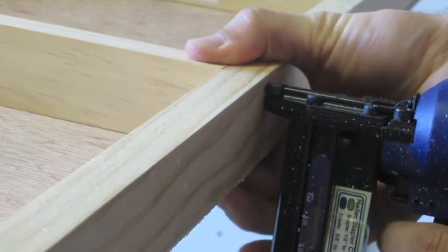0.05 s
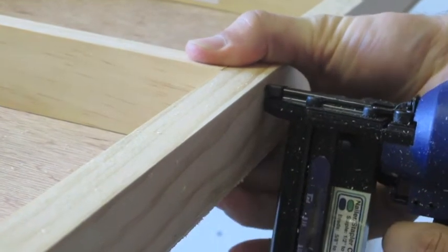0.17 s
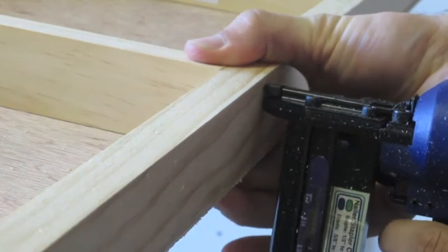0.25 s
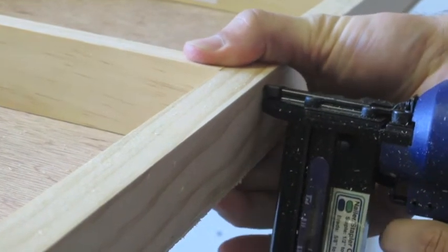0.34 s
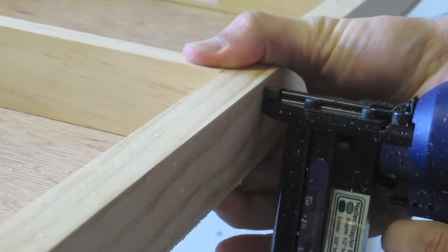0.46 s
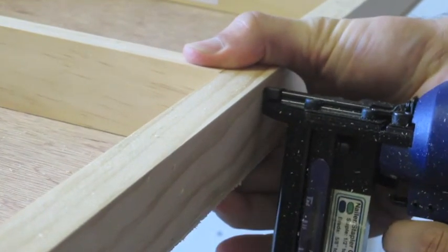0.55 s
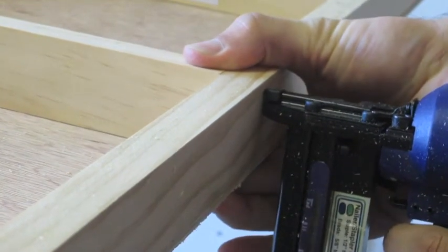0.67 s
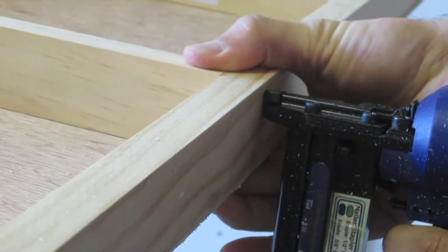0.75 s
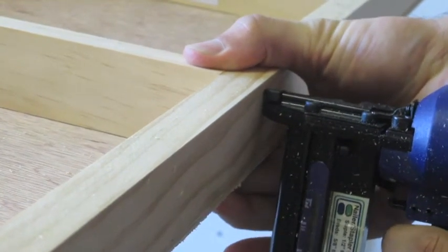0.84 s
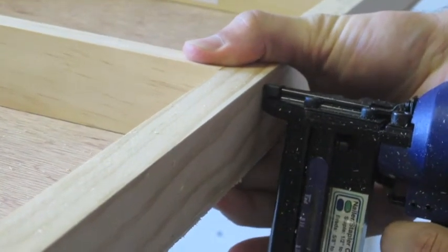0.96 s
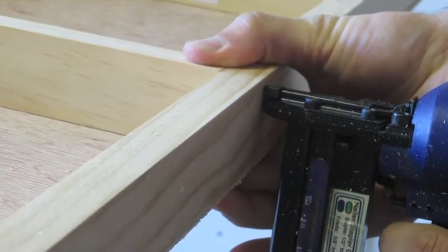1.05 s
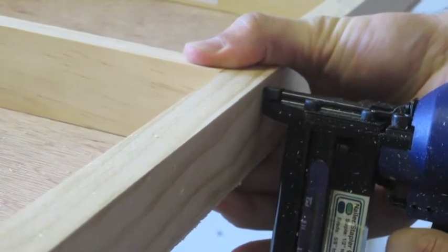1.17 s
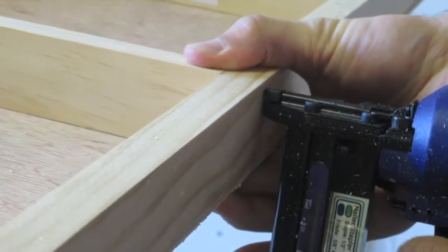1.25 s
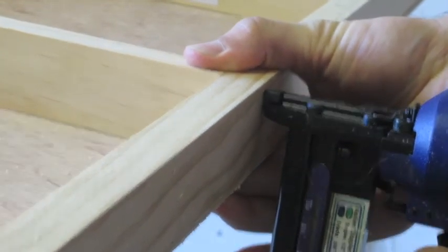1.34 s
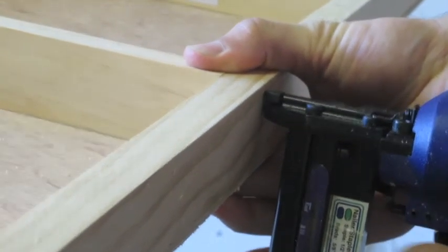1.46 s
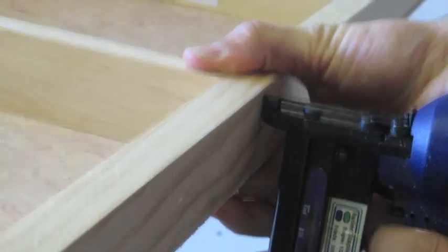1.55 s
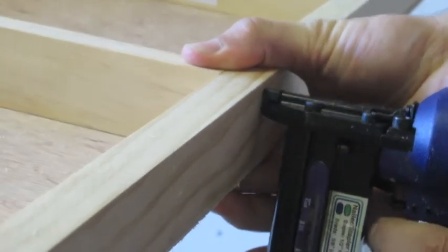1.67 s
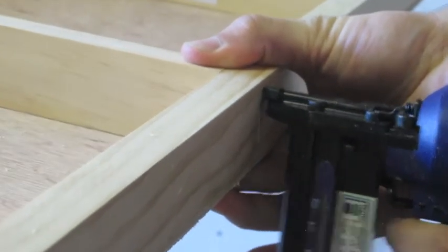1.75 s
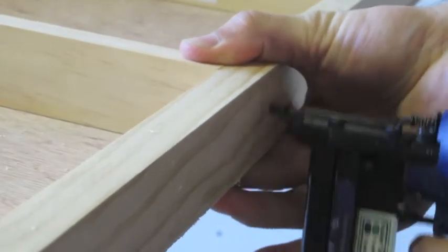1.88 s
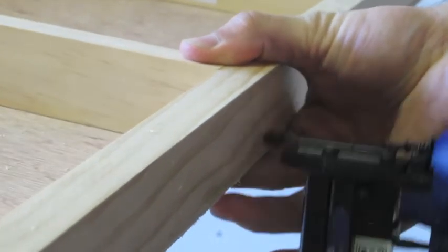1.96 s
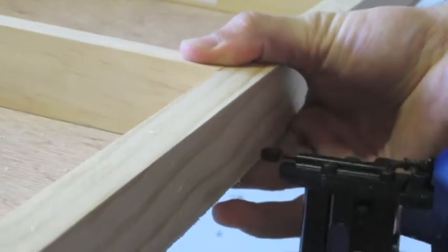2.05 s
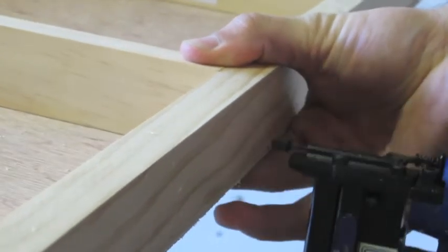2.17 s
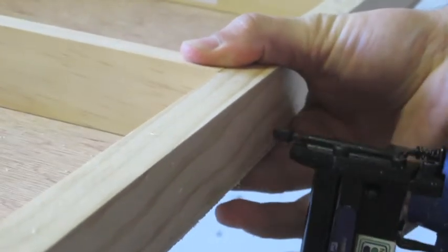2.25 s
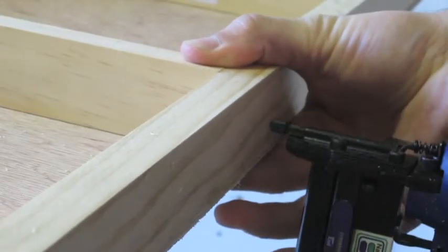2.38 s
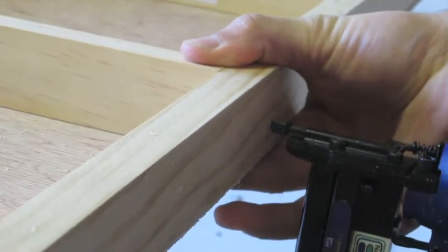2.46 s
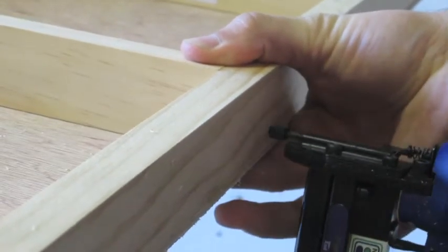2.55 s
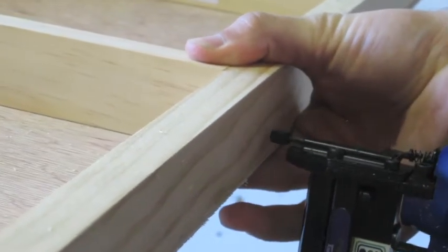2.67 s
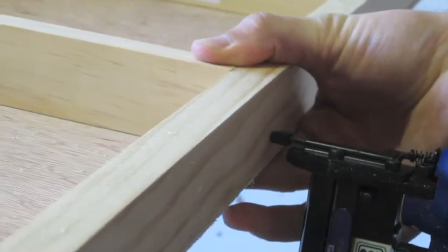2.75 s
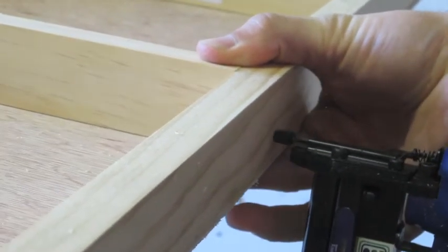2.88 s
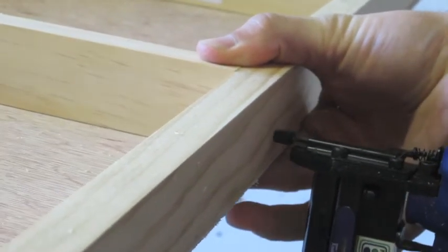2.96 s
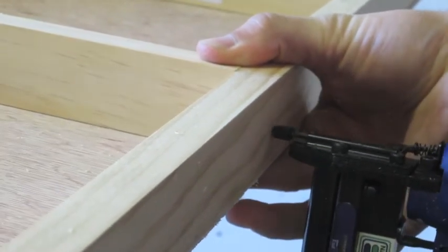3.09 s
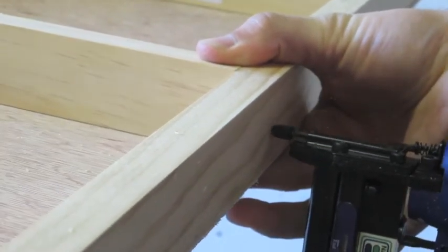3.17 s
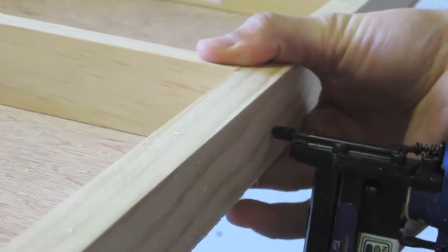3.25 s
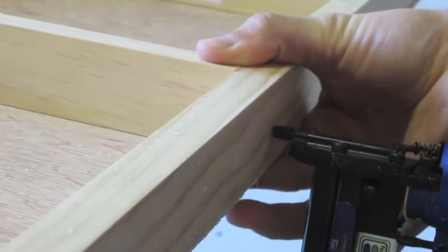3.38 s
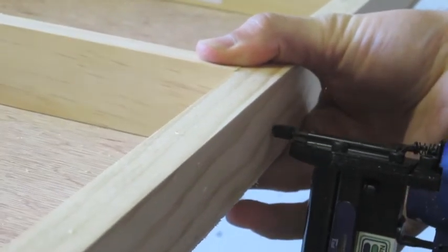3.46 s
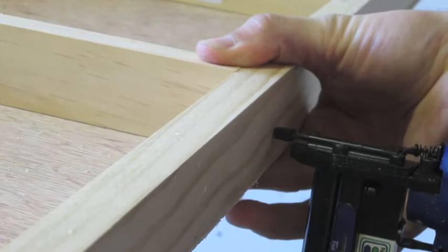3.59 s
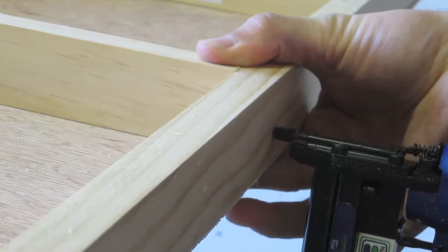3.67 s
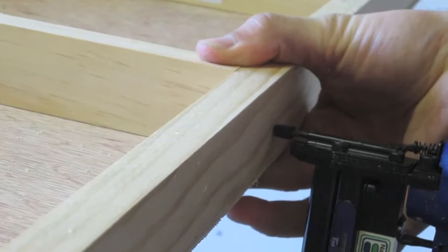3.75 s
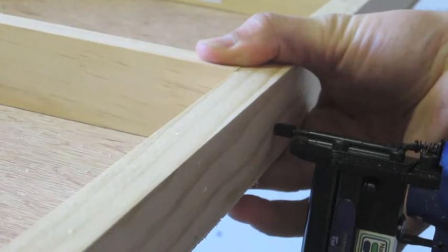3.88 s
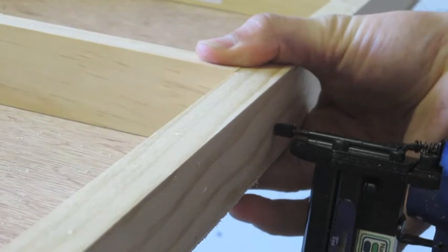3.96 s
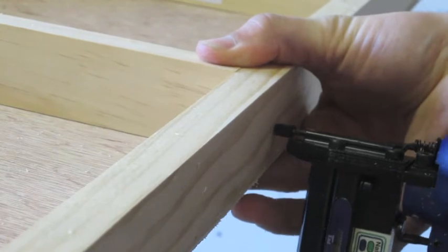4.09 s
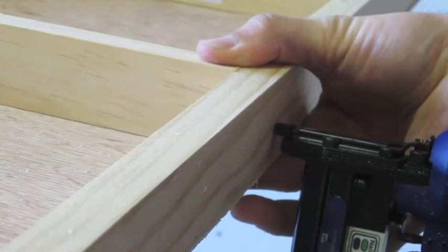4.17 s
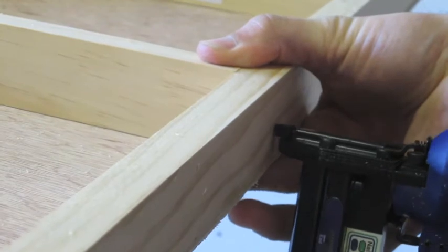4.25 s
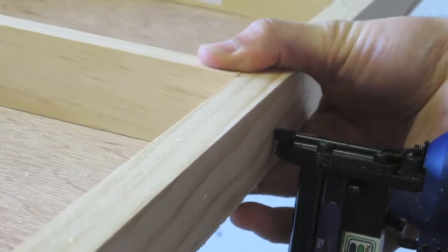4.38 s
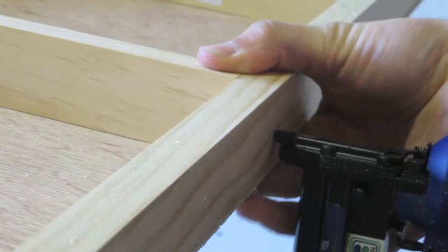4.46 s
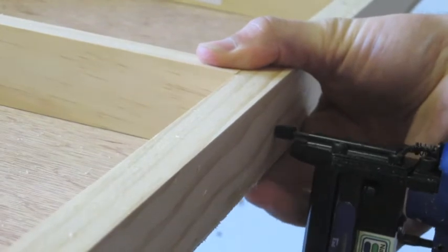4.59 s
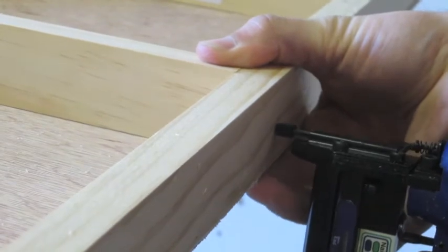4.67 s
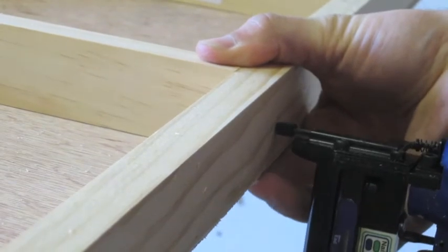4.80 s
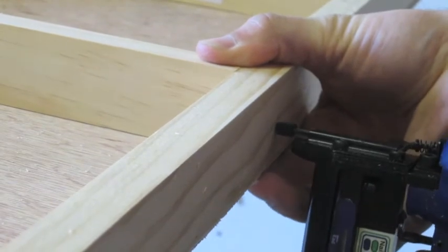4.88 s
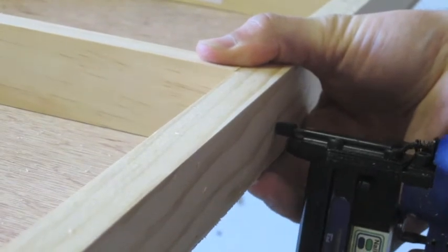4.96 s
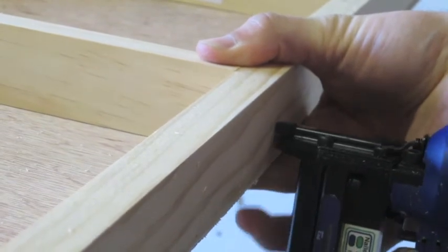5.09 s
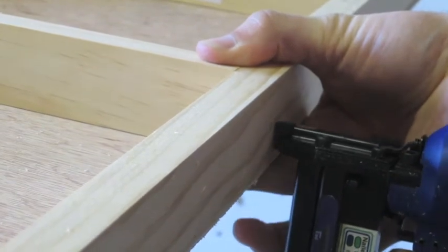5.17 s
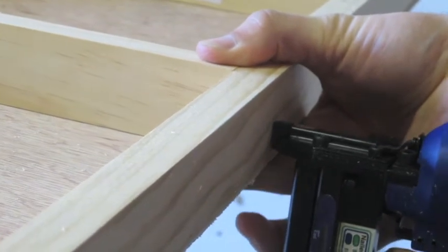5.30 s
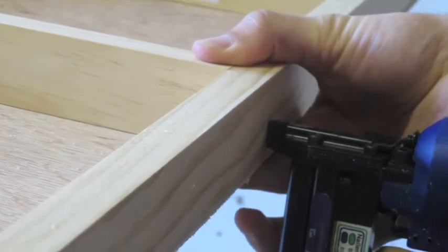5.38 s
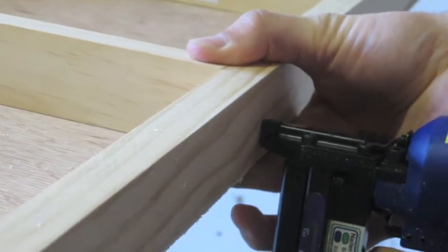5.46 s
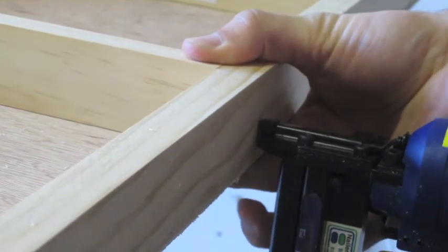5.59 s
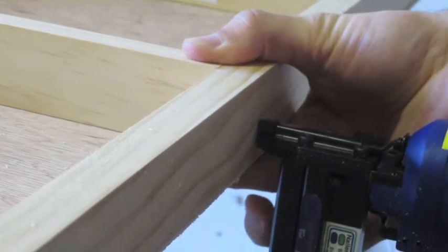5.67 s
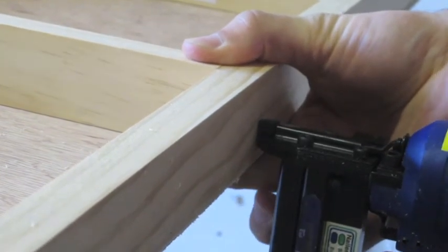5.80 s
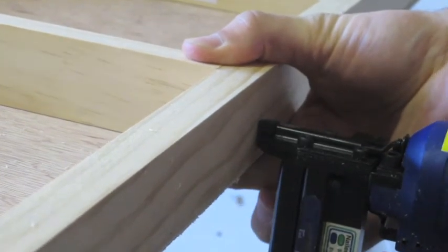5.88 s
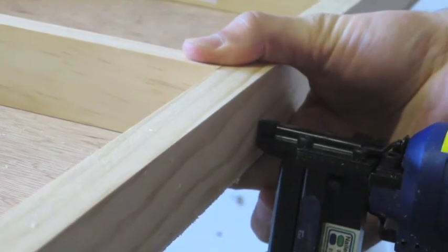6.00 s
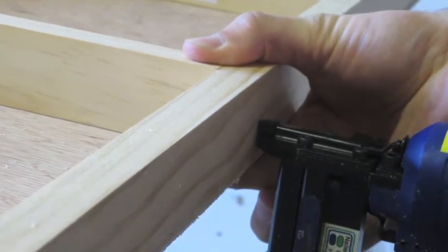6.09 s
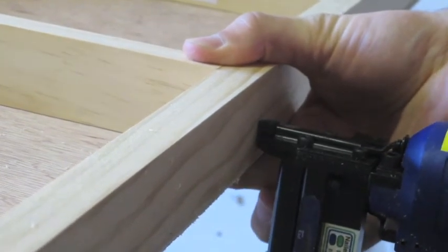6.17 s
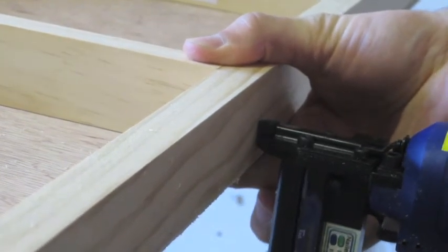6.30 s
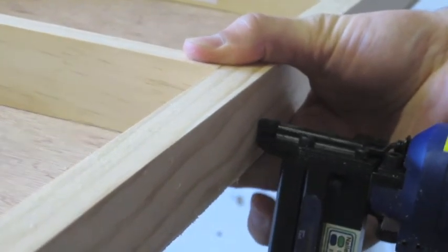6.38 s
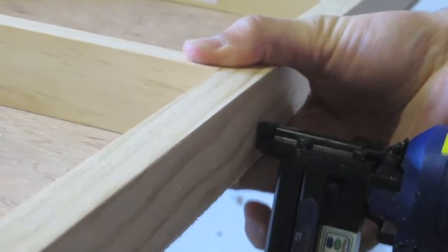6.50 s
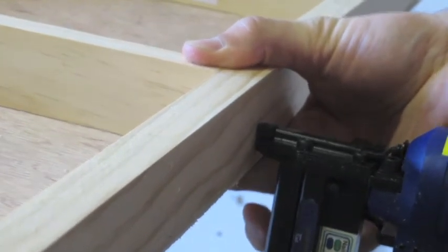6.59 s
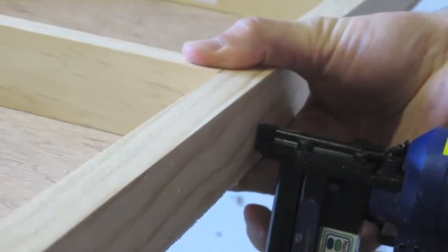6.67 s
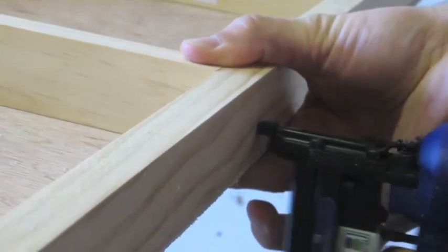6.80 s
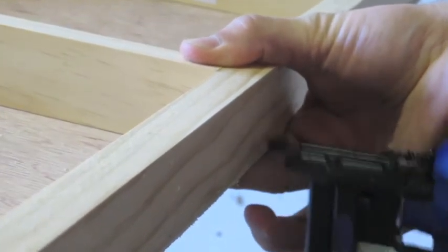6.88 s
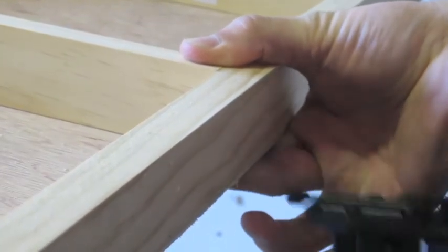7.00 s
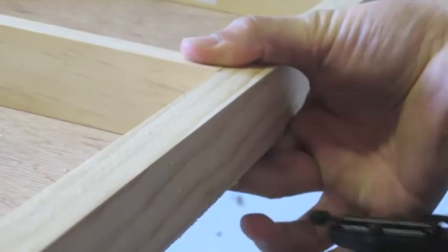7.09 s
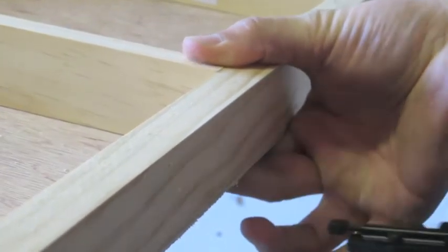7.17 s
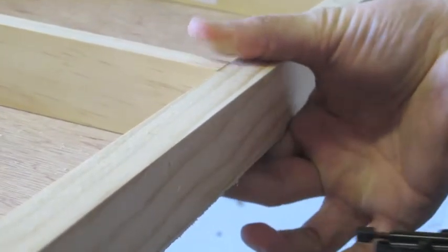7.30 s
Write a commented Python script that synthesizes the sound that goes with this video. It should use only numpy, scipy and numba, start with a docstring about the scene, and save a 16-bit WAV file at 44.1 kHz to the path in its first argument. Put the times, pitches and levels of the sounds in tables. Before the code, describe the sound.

A quiet, low workshop rush runs throughout, with faint distant chirps near 0.2, 0.8, 2.5, 3.5, 4.0 and 6.1 s. A small tap and soft bump come at 0.15 s; a thin, very high wavering air whistle plays from 0.2 to 0.9 s, with tiny bright catches up to 1.1 s. At 1.3 s a trigger tick leads into a hard valve crack and driver slam into wood, with room tail. At 1.5 s a click and sharp exhaust blast with a piston knock; at 1.84 s a steel snap. A slide leads to a double tap at 2.8 s, then scattered clicks, light rattles, rubs and dull thuds until 5.8 s, fullest around 4.5-5.2 s. The second shot bangs at 6.3 s, exhaust bursts at 6.5 s, tip snaps at 6.86 s, then the tail fades. Background dips after blasts and slowly recovers.

```python
"""Air brad nailer in a live workshop

An air nailer fires two brads into a wooden frame: trigger tick, valve crack and driver blow in shaped noise
and struck modes, then the exhaust's hiss, the piston's knock and the safety tip's snap.
Around the shots the nose taps, catches and slides on the wood; a hose coupling whistles on two gliding
harmonics, faint chirps call from afar, and a steady rush of noise lies beneath. A room tail answers the gun,
its contacts and the chirps; a gain control ducks on loud peaks and slowly recovers."""
import sys
import numpy as np
from scipy import signal
from scipy.fft import rfft, irfft
from scipy.io import wavfile
from scipy.ndimage import uniform_filter1d, map_coordinates
from numba import njit

SR = 44100
rng = np.random.default_rng(int(sys.argv[2]) if len(sys.argv) > 2 else 0)


def store_pcm(level_fs):
    """Save levels as 16-bit WAV."""
    pcm = np.round(np.clip(level_fs, -1, 1) * 32767).astype(np.int16)
    wavfile.write(sys.argv[1], SR, np.atleast_2d(pcm).T)


N = 323780
T = np.arange(SR // 2) / SR  # time within one event [s]

# firing strokes: (trigger pulled [s], valve opens [s], driver lands [s], ring level before a common boost [dB])
SHOTS = [(1.2898, 1.315, 1.3388, 8), (6.3082, 6.3219, 6.3407, 10.5)]
# return strokes: (exhaust opens [s], exhaust level [dB], safety tip snaps back [s])
RETURNS = [(1.52, 7.2, 1.8378), (6.5093, 8.3, 6.8583)]
# modes of the gun's metal housing: (frequency [Hz], relative level [dB], t60 [s])
HOUSING = [(1184, 0, .7), (1575, -6.5, .7), (4600, -7, .55), (4810, -7, .5), (5265, -6, .6),
           (8604, -5, .45), (9960, -6, .45), (12322, -7, .4)]
# modes of the frame on the bench: (frequency [Hz], relative level [dB], t60 [s])
FRAME = [(130.8, -0.5, .6), (212, -3.5, .25), (228, -6, 0.7), (270, -11, 0.27)]


def amp(db):
    """Decibels to gain."""
    return 10 ** (np.asarray(db) / 20)


def unit(x):
    """Scaled to rms 1."""
    return x / np.sqrt(np.mean(x ** 2) + 1e-20)


def along(points, hz):
    """Interpolate (Hz, value) points on a log frequency axis."""
    f, v = np.transpose(points)
    return np.interp(np.log(hz + 1), np.log(f + 1), v)


def add(track, s, sound):
    """Mix a sound into the track at time s."""
    start = max(round(s * SR), 0)
    track[start:start + len(sound)] += sound[:max(N - start, 0)]


def noise(spectrum, size=len(T)):
    """Noise of rms 1 with a given colour."""
    white = rfft(rng.standard_normal(size))
    colour = amp(along(spectrum, np.fft.rfftfreq(size, 1 / SR)))
    return unit(irfft(white * colour, size))


def resonant(peaks, size=len(T)):
    """A body shaken at random: noise of rms 1 in its resonances."""
    f = np.fft.rfftfreq(size, 1 / SR)
    body = 0
    for k, (hz, width, db) in enumerate(peaks):
        resonance = 1j * f * width / (hz * hz - f * f + 1j * f * width)
        body = body + (-1) ** k * amp(db) * resonance  # neighbours in opposite phase
    return unit(irfft(rfft(rng.standard_normal(size)) * body, size))


def ring(modes):
    """Struck modes that die away, each at a slightly new strength."""
    out = np.zeros(len(T))
    for hz, db, t60 in modes:
        decay = amp(db + rng.normal(0, 1) - 60 * T / t60)
        out += decay * np.sin(2 * np.pi * hz * T)
    return out


def burst(rise, hold, t60):
    """An envelope that rises, holds and dies away."""
    return (1 - np.exp(-T / rise)) * amp(-60 * np.maximum(T - hold, 0) / t60)


def background():
    """The steady rush of the workshop: coloured noise drifting slightly in level."""
    # rush of the workshop: (frequency [Hz], relative density [dB])
    air_colour = [(12, -36), (20, -3.5), (98, -0.5), (222, -8.5), (310, -12), (607, -12), (802, -9.5),
                  (1060, -12.5), (1570, -17), (2750, -26), (5080, -30), (6720, -31.5), (7310, -31.5),
                  (13200, -39.5), (16000, -49.5)]
    drift = map_coordinates(rng.standard_normal(64), [np.arange(N) / SR * 4])  # 4 random points a second
    return amp(-49.5 + .4 * drift) * noise(air_colour, size=N)


def chirps():
    """Short calls whose falling pitch wavers at random under a half-sine swell."""
    # faint high chirps: (time [s], middle pitch [Hz], level before distance and room [dB])
    calls = [(.191, 3900, -57), (.785, 4850, -56.5), (2.45, 3900, -61), (3.5, 5600, -65), (4.03, 4750, -57),
             (6.1, 4300, -66.5)]
    length_s, fall = .12, .13  # fall: share of the middle pitch
    out = np.zeros(N)
    for s, middle_hz, db in calls:
        u = np.minimum(T / length_s, 1)
        waver = unit(uniform_filter1d(rng.standard_normal(len(T)), size=60))
        hz = middle_hz * (1 - fall * (u - .5)) * (1 + .07 * waver)
        add(out, s, amp(db) * np.sin(np.pi * u) * np.sin(2 * np.pi * np.cumsum(hz) / SR))
    return out


def leak():
    """Air whistles at the hose coupling on its second and third harmonics, over a narrow hiss; less flow is lower and softer."""
    # whistle's path: (time [s], fundamental [Hz])
    pitch_path = [(.2, 4170), (.33, 4430), (.441, 4880), (.51, 4780), (.581, 5000), (.63, 4820),
                  (.72, 5030), (.79, 4650), (.92, 3800)]
    # narrow hiss: (frequency [Hz], width [Hz], relative level [dB])
    hiss_peak = [(2606, 170, 0)]
    s, hz = np.transpose(pitch_path)
    db = -64 + .006 * (hz - hz.max())  # softer by .006 dB per Hz below the highest pitch
    t = np.arange(N) / SR
    flutter = unit(uniform_filter1d(rng.standard_normal(N), size=30))
    flicker = unit(uniform_filter1d(rng.standard_normal(N), size=900))
    phase = 2 * np.pi * np.cumsum(np.interp(t, s, hz) * (1 + .012 * flutter)) / SR
    second, third = np.sin(2 * phase), np.sin(3 * phase)
    whistle = amp(-4 + 3 * flicker) * (second + amp(-6) * third)
    hiss = amp(6.5) * resonant(hiss_peak, size=N)
    level = amp(np.interp(t, s, db, left=-150, right=-150))  # inaudible outside the path
    return level * (whistle + hiss)


def clicks(rows, steel_t60):
    """Loose steel parts rattle briefly at each contact, with a bright tick and a knock in the wood."""
    # resonances of the gun's nose: (frequency [Hz], width [Hz], relative level [dB])
    steel = [(1300, 250, -3.5), (2150, 260, 0), (2550, 400, 0.5), (3640, 450, 1), (4700, 600, -5),
             (6300, 1200, -10.5)]
    # knock in the wood: (frequency [Hz], relative density [dB])
    wood_colour = [(60, -13.5), (200, -8), (450, -4), (750, 1), (1150, -2.5), (2500, -20), (8000, -57)]
    out = np.zeros(N)
    for s, steel_db, wood_db, tick_db, tick_hz, length in rows:
        # each contact falls on another spot and weights the resonances anew
        spot = [(hz * np.exp(rng.normal(0, 0.031)), width, db + rng.normal(0, 1)) for hz, width, db in steel]
        tick = noise([(tick_hz / 4, -30), (tick_hz * .8, -8), (tick_hz, 0),
                      (tick_hz * 1.2, -7), (tick_hz * 1.5, -18), (tick_hz * 2, -25)])
        add(out, s, amp(steel_db) * resonant(spot) * burst(rise=0.00015, hold=length, t60=steel_t60))
        add(out, s, amp(tick_db) * tick * burst(rise=.0002, hold=length, t60=0.011))
        add(out, s, amp(wood_db) * noise(wood_colour) * burst(rise=0.00028, hold=length, t60=0.067))
    return out


def taps():
    """The harder the nose taps, the brighter it cracks; a light catch of the tip is almost all tick."""
    # nose on wood: (time [s], steel level [dB], knock level [dB], rattle hold [s])
    nose_taps = [(.1472, -43, -43.5, .0046), (1.096, -47.5, -70, .001), (2.8095, -44, -34, .0025),
                 (2.8248, -33, -35.5, .0074), (3.162, -46, -62, .0035), (3.43, -55, -40, .0015),
                 (3.4515, -41.5, -40, .0029), (3.6594, -47.5, -49, .004), (3.8061, -39.5, -53, .002),
                 (3.9293, -52, -62, .002), (4.521, -33, -40.5, .0025), (4.61, -55, -44, .005),
                 (4.7365, -41, -52, .003), (4.749, -38.5, -44, .0027), (4.7675, -47, -54, .002),
                 (5.1156, -37, -45, .0018), (5.2069, -46.5, -37.5, .003), (5.3975, -39, -40, .0029),
                 (5.8265, -36.5, -39.5, .0042)]
    # light catches of the tip: (time [s], tick level [dB], tick pitch [Hz])
    tip_catches = [(.7678, -49.5, 10000), (.9404, -41.5, 8500), (.9708, -43, 9500), (3.4364, -39.5, 10200),
                   (4.1079, -46, 9450), (4.6541, -49, 8000), (4.953, -48.5, 9400)]
    # crack of a tap: (frequency [Hz], relative density [dB])
    crack_colour = [(1000, -37), (4000, -4.5), (7000, -0.5), (9000, 0), (12000, -5), (15500, -13.5)]
    tap_hz, catch_s = 6800, .0013  # a tap's tick pitch [Hz]; a catch's hold [s]
    out, rows = np.zeros(N), []
    for s, db, wood_db, length in nose_taps:
        bright_db = db + .35 * (db + 20)  # tick and crack would equal the steel at -20 dB
        rows.append((s, db, wood_db, bright_db, tap_hz, length))
        add(out, s, amp(bright_db) * noise(crack_colour) * burst(rise=.0001, hold=length / 2, t60=.008))
    for s, db, hz in tip_catches:
        rows.append((s, db - 15, db - 21, db, hz, catch_s))
    return out + clicks(rows, steel_t60=.031)


def handling():
    """The nose taps and rubs along the frame, which thuds on the bench as a decaying tone and low noise."""
    # soft bumps: (time [s], tone level [dB], shudder level [dB], resonance [Hz], hold [s])
    bumps = [(.149, -51.5, -52.5, 199.4, .047), (3.432, -58, -48, 200, .02), (4.531, -54, -50.5, 132, .11),
             (5.101, -38.5, -50.5, 128, .035), (5.207, -39, -39, 128.5, .034),
             (5.216, -34, -46, 212.4, .037), (5.828, -48, -45.5, 206.5, .052)]
    # slides over the wood: (middle [s], level [dB])
    slides = [(2.759, -48.5), (4.578, -55.5), (5.47, -48.5)]
    # rub on wood: (frequency [Hz], relative density [dB])
    rub_colour = [(100, 5), (900, 6), (2500, -2), (6000, -7.5), (11000, -13.5), (15500, -24)]
    slide_half_s = .088  # a slide swells and fades over this time
    out = taps()
    for s, tone_db, shudder_db, hz, length in bumps:
        shudder = noise([(hz / 3, -10), (hz, 0), (hz * 2, -3), (hz * 5, -24), (hz * 20, -70)])
        thud = amp(tone_db) * np.sin(2 * np.pi * hz * T) + amp(shudder_db) * shudder
        # the hand cushions the bump: a slow rise
        add(out, s, thud * burst(rise=.004, hold=length, t60=.18))
    for middle, db in slides:
        swell = np.exp(-(T / slide_half_s - 2) ** 2)
        add(out, middle - 2 * slide_half_s, amp(db) * noise(rub_colour) * swell)
    return out


def latches():
    """The trigger clicks before each shot and just before the exhaust; the safety tip snaps back and rings the housing."""
    # one latch each: (steel level [dB], knock level [dB], tick level [dB], tick pitch [Hz], rattle hold [s])
    trigger_pull = (-42.5, -54, -28.5, 8850, .001)
    trigger_release = (-17, -40, -11, 10500, .0045)
    tip_snap = (-15, -36, -14.5, 9400, .0074)
    release_lead_s = .013  # the trigger lets go this long before the exhaust opens
    rows = [(pulled, *trigger_pull) for pulled, *_ in SHOTS]
    housing = np.zeros(N)
    for opens, _, snaps_back in RETURNS:
        rows.append((opens - release_lead_s, *trigger_release))
        rows.append((snaps_back, *tip_snap))
        add(housing, snaps_back, amp(-47) * ring(HOUSING))
    return housing + clicks(rows, steel_t60=.022)


def returning():
    """On trigger release the air blows off, puffs at the microphone, and the piston knocks against its top stop."""
    # air jet, low puff, piston knock: (frequency [Hz], relative density [dB])
    exhaust_colour = [(30, -6), (130, -6), (350, -14.5), (700, -11.5), (1200, -9.5), (2200, -10),
                      (3000, -11.5), (5700, -3.5), (9000, -0.5), (12000, -0.5), (15000, -7.5),
                      (16000, -15.5)]
    puff_colour = [(20, -3), (45, 0), (100, -6), (300, -28.5), (1000, -69.5)]
    stop_colour = [(60, -14), (150, -7.5), (400, -20), (850, -9), (1200, 4.5), (2000, -5), (4500, -5.5),
                   (8000, -13.5), (15000, -25)]
    return_s = .0222  # the piston's way back
    out = np.zeros(N)
    for opens, air_db, _ in RETURNS:
        stops, knock_db = opens + return_s, air_db - 1.6
        # the jet weakens by 110 dB a second, then dies faster once the piston is home
        jet = burst(rise=0.00096, hold=return_s, t60=.035) * amp(-110 * T)
        add(out, opens, amp(air_db) * jet * (noise(exhaust_colour) + amp(-21.5) * noise(puff_colour)))
        add(out, stops, amp(knock_db) * noise(stop_colour) * burst(rise=0.00025, hold=.004, t60=0.02))
        add(out, stops, amp(knock_db - 24) * ring(FRAME))
        add(out, stops, amp(knock_db - 30) * ring(HOUSING))
    return out


def firing():
    """The valve cracks open, air fills the cylinder, and the driver slams the brad into the rail."""
    # what each brad rings in rail and gun, one list a shot: (frequency [Hz], relative level [dB], t60 [s])
    brad_modes = [
        [(1600, 0, .022), (1780, -2, 0.018), (2020, -7.5, 0.022), (2450, -12, .018), (3780, -5, .026),
         (4880, -3, .024)],
        [(1039, -2, .028), (1210, -1, 0.026), (2040, -13, .02), (3120, -15, .018), (4550, -9, 0.022),
         (5420, -9.5, .018)],
    ]
    # valve crack, filling air, driver blow: (frequency [Hz], relative density [dB])
    valve_colour = [(40, -2), (200, 0.5), (600, -10.5), (1100, -17), (1900, -8.5), (2900, 2), (5500, 0),
                    (9000, 0.5), (13000, -3.5), (15500, -7.5)]
    fill_colour = [(40, -1.5), (200, -5), (600, -12.5), (1600, -17.5), (2600, -2.5), (4200, -1.5),
                   (8000, -4), (15500, -9)]
    blow_colour = [(24, -40.5), (40, -15), (382, -22.5), (503, -13), (615, -17.5), (1120, -1.5), (1370, -2),
                   (2570, -2.5), (3300, -6.5), (4800, -4.5), (6330, -9.5), (12500, -13), (16000, -29.5)]
    valve_db, blow_db = 3.3, 10.4  # the same air pressure drives every shot
    out = np.zeros(N)
    for (_, opens, lands, ring_db), modes in zip(SHOTS, brad_modes):
        add(out, opens, amp(valve_db) * noise(valve_colour) * burst(rise=0.00085, hold=0.0027, t60=.012))
        # the inflow fades by 190 dB a second until the driver lands
        inflow = burst(rise=.002, hold=lands - opens, t60=.01) * amp(-190 * T)
        add(out, opens, amp(valve_db - 10.5) * noise(fill_colour) * inflow)
        # the gun's recoil sends out one swing of pressure
        u = (T - .0009) / .00037
        add(out, lands - .0003, amp(blow_db + 3.8) * u * np.exp(-u * u / 2))
        add(out, lands + .0006, amp(blow_db) * noise(blow_colour) * burst(rise=.0004, hold=.007, t60=.033))
        add(out, lands + 0.00054, amp(ring_db + 6) * ring(modes))
        add(out, lands, amp(blow_db - 26.5) * ring(FRAME))
    return out


def room(x):
    """The workshop's diffuse answer: a tail of decaying noise whose highest treble dies first."""
    # decay: (frequency [Hz], t60 [s])
    room_t60 = [(100, .7), (400, 0.77), (1300, 0.69), (4000, 0.69), (8000, 0.53), (14000, .38)]
    # colour of the tail: (frequency [Hz], relative level [dB])
    room_colour = [(50, -16), (150, -2.5), (400, -4.5), (700, -1), (1300, -1), (5000, -1), (9000, -1.5),
                   (15000, -3)]
    hz, t, z = signal.stft(rng.standard_normal(SR + SR // 2), SR, nperseg=256)
    decay = amp(along(room_colour, hz)[:, None] - 60 * t / along(room_t60, hz)[:, None])
    tail = signal.istft(z * decay, SR, nperseg=256)[1]
    tail = tail * (1 - np.exp(-np.arange(len(tail)) / SR / 0.0034))  # reflections build up over 3.4 ms
    return signal.fftconvolve(x, tail / np.linalg.norm(tail))[:N]


def shot_echo(count=3):
    """The gun radiates a different blast in each direction; each takes its own path round the room."""
    paths = [room(amp(-4.5) * firing() + amp(-7.5) * returning()) for _ in range(count)]
    return sum(paths) / np.sqrt(count)


def scene():
    """The gun and frame nearby, the chirps afar, their echo in the room, and the background."""
    far, contacts, snaps = chirps(), handling(), latches()
    near = firing() + returning() + snaps + contacts + leak()
    echo = shot_echo() + room(amp(-13.5) * snaps + amp(-9) * contacts + far)
    return (near + amp(-3) * far + echo + background())[None]


@njit
def ducking(excess, attack, release, ease):
    """Gain reduction in dB: it chases any excess quickly and lets go slowly, easing out near zero."""
    out, cut = np.zeros(len(excess)), 0.0
    for i in range(len(excess)):
        if excess[i] > cut:
            cut += (excess[i] - cut) * attack
        else:
            cut -= release * cut / (cut + ease)
        out[i] = cut
    return out


def record(dry):
    """Gain control, the recorder's own hiss, soft clipping of what slips through, and the band limit."""
    x = dry[0]
    power = signal.lfilter([1 / 64], [1, 1 / 64 - 1], x * x)  # smoothed over about 64 samples
    threshold_db, attack_s, release_db_per_s, ease_db = -12.4, .0005, 17, 5.83
    excess = 10 * np.log10(power + 1e-12) - threshold_db
    x = x * amp(-ducking(excess, 1 / (attack_s * SR), release_db_per_s / SR, ease_db))
    x = x + amp(-71) * noise([(100, 6), (2000, 0), (9000, -3.5), (16000, -15)], size=N)
    ceiling, top_hz = .64, 16000
    x = ceiling * np.tanh(x / ceiling)
    low_pass = 1 / (1 + (np.fft.rfftfreq(N, 1 / SR) / top_hz) ** 110)
    return irfft(rfft(x) * low_pass, N)[None]


dry = scene()
out = record(dry)
store_pcm(out)
```